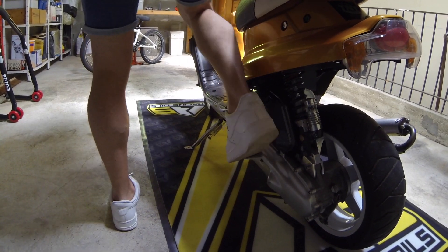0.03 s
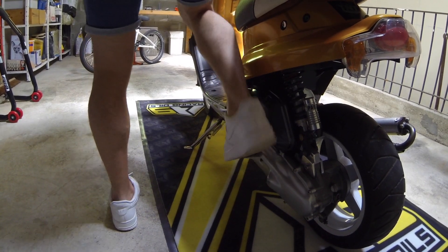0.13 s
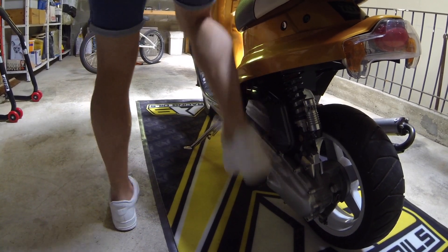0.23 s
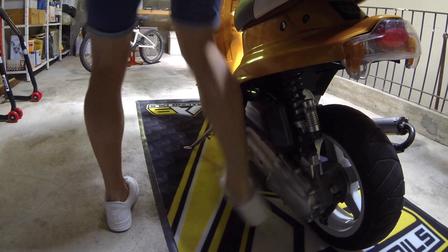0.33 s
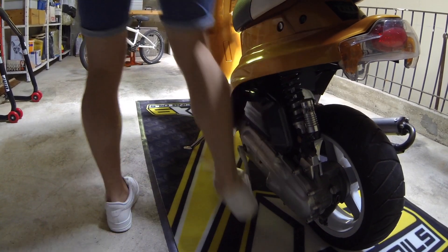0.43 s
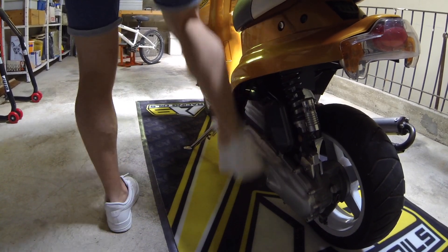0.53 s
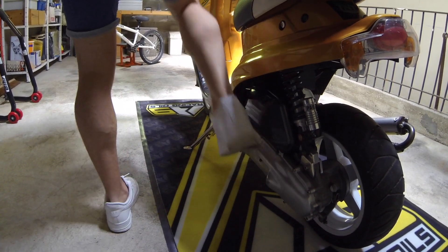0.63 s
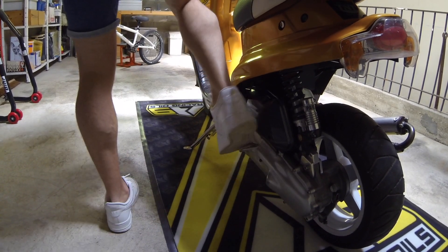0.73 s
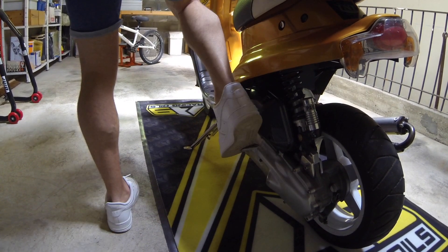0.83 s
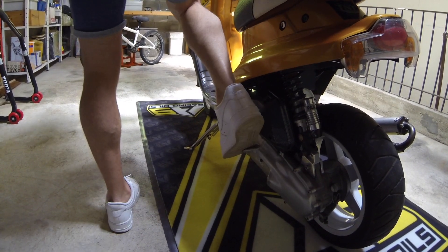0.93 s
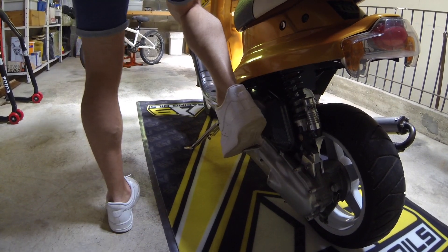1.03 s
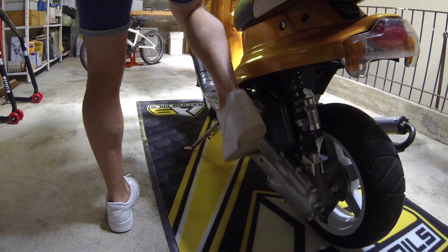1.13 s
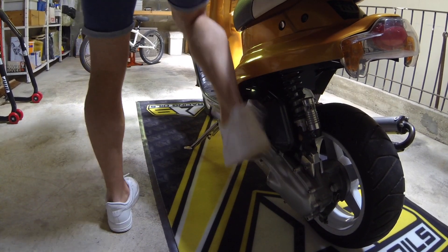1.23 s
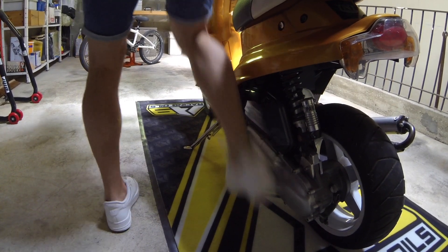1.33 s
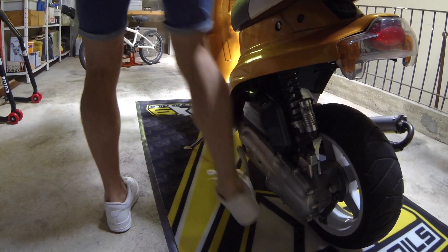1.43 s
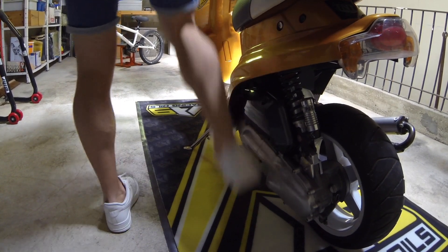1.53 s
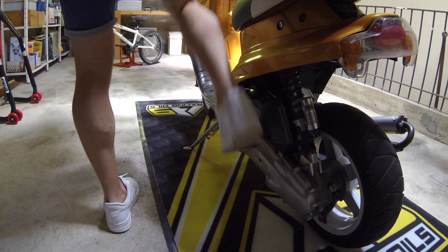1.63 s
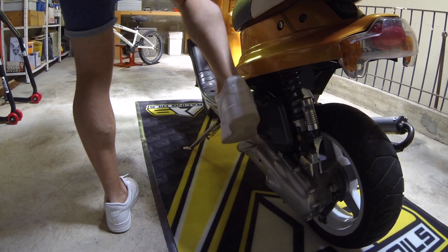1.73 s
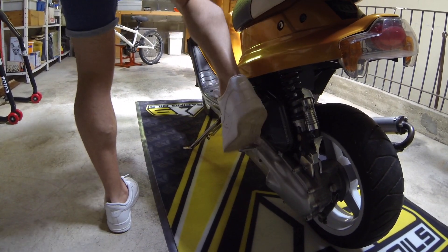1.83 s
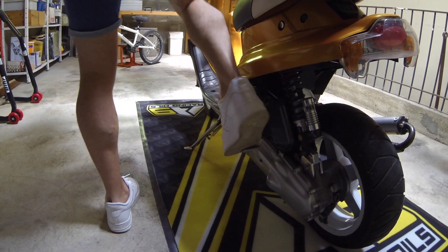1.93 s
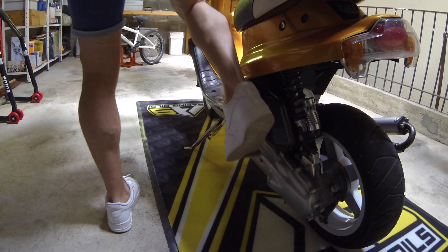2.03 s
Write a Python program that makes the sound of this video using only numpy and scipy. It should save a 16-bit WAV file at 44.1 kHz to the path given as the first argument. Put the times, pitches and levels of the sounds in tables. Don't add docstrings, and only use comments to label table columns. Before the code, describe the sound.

Two failed kick starts on a small scooter, heard close in an echoing concrete room: light lever clicks, grinding gear teeth, sharp clank at the stop, fading whirr and soft exhaust puffs, springy lever return.

```python
import sys
import numpy as np
from scipy import signal
from scipy.fft import rfft, irfft
from scipy.io import wavfile
from scipy.ndimage import uniform_filter1d

SR = 44100
rng = np.random.default_rng(int(sys.argv[2]) if len(sys.argv) > 2 else 0)


def field_ratio(decibels):
    return 10 ** (np.asarray(decibels, dtype=float) / 20)


def waveform_to_disk(signal):
    frames = np.transpose(np.atleast_2d(signal))
    scaled = np.clip(frames, -1, 1) * 32767
    samples = np.round(scaled).astype(np.int16)
    wavfile.write(sys.argv[1], SR, samples)


N = 92610

# frequency in Hz, density in dB per Hz.
AIR_SPECTRUM = [(12, -26.5), (20, 7), (60, -7), (150, -21.5), (193, -31.5), (270, -20.5), (5230, -46.5),
                (13500, -56.5), (16000, -71.5)]
# frequency in Hz, t60 in seconds.
GARAGE_DECAY = [(100, 0.98), (700, 0.45), (3000, 0.42), (12000, 0.29)]

# time in seconds, whirr level in dB.
COAST_LEVELS = [
    [(0.29, -26.5), (0.336, -41), (0.414, -44), (0.451, -40), (0.459, -32), (0.47, -53), (0.632, -85),
     (0.64, -54)],
    [(1.33, -26), (1.396, -44), (1.504, -41), (1.522, -50), (1.566, -48), (1.684, -65), (1.69, -52)],
]
# frequency in Hz, density in dB per Hz.
WHIRR_SPECTRUM = [(120, -54), (200, -4), (437, 2.5), (1110, -14), (1260, -13), (1430, -40.5), (1810, -1),
                  (11800, -41), (15500, -44)]
# start in seconds, length in seconds, level in dB.
EXHAUST_PUFFS = [(.21, 0.18, -33), (.285, 0.15, -28), (.41, 0.026, -43), (.53, 0.046, -35.5),
                 (.56, 0.042, -40.5), (1.085, 0.05, -45.5), (1.245, 0.2, -33), (1.32, 0.062, -28),
                 (1.41, 0.046, -33.5), (1.48, 0.077, -39.5), (1.585, 0.054, -37), (1.775, 0.037, -40),
                 (1.7, 0.07, -46.5), (2.03, 0.042, -51)]
# frequency in Hz, width in Hz, level in dB.
EXHAUST_MODES = [(38.3, 8.6, -6), (61.6, 14, 1.5), (121, 20.1, 4), (140.8, 20, 1.5), (256, 53.6, -3)]
# start in seconds, length in seconds, pitch in Hz, level in dB.
BEARING_SQUEAKS = [(0.417, 0.079, 1770, -42), (1.42, 0.13, 1850, -52), (1.451, 0.053, 1280, -38),
                   (1.534, 0.035, 1322, -38.5), (1.557, 0.043, 1255, -38), (0.456, 0.19, 1824, -51)]

# time in seconds, peak in dB.
SPRING_TICKS = [(0.192, -55), (.217, -53.5), (.24, -53.5), (.262, -50), (0.36, -37.5), (0.726, -46.5),
                (1.2386, -63), (1.274, -62), (1.4384, -46), (1.4599, -42), (1.497, -52.5), (1.561, -56),
                (1.709, -43.5), (1.785, -42.5)]
# time in seconds, level in dB.
COVER_KNOCKS = [(.059, -46.5), (.074, -42.5), (0.565, -34), (0.645, -33.5), (.6476, -31), (.6528, -29.5),
                (0.714, -37.5), (1.207, -39.5), (1.6925, -34), (1.6977, -28.5), (1.7028, -30),
                (1.7221, -31.5), (1.796, -48)]
# frequency in Hz, level in dB, t60 in seconds.
COVER_MODES = [(658, -15.5, 0.19), (695, -9, 0.08), (736, -10, 0.061), (776.7, 0, 0.13), (830, -14, 0.14),
               (541, -24, 0.15)]
# time in seconds, level in dB.
LEVER_RETURNS = [
    (0.6427, -42),
    (0.6461, -40.5),
    (1.6923, -45.5),
    (1.6956, -41.5),
]
# frequency in Hz, level in dB, t60 in seconds.
LEVER_MODES = [(1080, -10.5, 0.037), (1350, -8, .025), (1876, 4, 0.047), (2370, 0.5, 0.032),
               (2670, -1.5, 0.038), (3340, -16, .02), (3920, 3, .02), (4360, 2, 0.013), (4940, -2.5, 0.01),
               (5160, -3, .012), (5900, -14, .012)]

# time in seconds, level in dB.
GEAR_STROKES = [
    [(0.15, -57.5), (0.197, -36)],
    [(0.204, -33.5), (0.218, -25.5), (0.26, -28), (0.272, -22.5)],
    [(0.292, -26), (0.418, -39.5), (0.434, -32), (0.46, -37.5), (0.53, -64)],
    [(1.19, -48), (1.212, -47.5), (1.22, -56), (1.23, -36.5)],
    [(1.237, -33.5), (1.261, -24), (1.291, -32.5), (1.31, -23)],
    [(1.33, -34), (1.382, -32), (1.538, -42.5), (1.628, -45), (1.66, -45)],
]
# time in seconds, level in dB above the scrape.
LOADED_TEETH = [(0.205, 3.5), (0.2157, 3), (0.226, 5), (0.2351, 5.5), (.2445, 2.5), (.2525, 0),
                (0.2653, 4.5), (0.274, -1), (1.2366, 0), (1.25, 5.5), (1.2599, 0), (1.271, 8.5),
                (1.2847, 6.5), (1.297, 10), (1.311, 7.5)]
# frequency in Hz, width in Hz, level in dB.
GEAR_MODES = [(128, 37, -8), (253.5, 80, -8), (444.2, 41, 4), (641, 58, 3.5), (724, 110, 1),
              (853.5, 54, 2.5), (1135, 170, -10), (1850, 170, -16.5), (2400, 530, -26), (3800, 720, -28.5),
              (5240, 500, -35)]

# time in seconds, peak in dB, treble in dB, bass in dB, snap hardness in dB.
CONTACTS = [(0.0635, -39, -22.5, 4, -14), (0.0837, -37.5, -40.5, -2, 1), (0.161, -45.5, -33, -7.5, -11),
            (0.203, -40.5, -35, -2, -2), (0.2772, -5, -12.5, -3, 8), (0.4339, -26.5, -13, -1, 7),
            (0.438, -26.5, -9, -7, -2), (0.4537, -16.5, -10, -10, 1.5), (0.4575, -21.5, -15, -11, -3),
            (0.5662, -31.5, -39, -2, -10), (0.6433, -24.5, -22, -15, -6.5), (0.8324, -50.5, -40.5, 3.5, -8),
            (1.008, -49.5, -30, -5.5, -7), (1.0188, -23, -24.5, -12, 1.5), (1.0837, -24, -21.5, -3, 1.5),
            (1.208, -65, -33, -1.5, -1), (1.237, -36.5, -52, 6.5, -1), (1.3158, -6, -12.5, -2.5, 7.5),
            (1.5393, -39.5, -33, 1, 3), (1.5584, -30, -39, -1.5, -16), (1.6918, -21.5, -20, -15, -17),
            (1.9162, -23, -26, -11.5, 3.5), (1.9879, -34.5, -43, -4, 1)]
# frequency in Hz, density in dB per Hz.
CRACK_SPECTRUM = [(59, -42.5), (100, -13.5), (791, -3), (1090, -8), (2580, -10.5), (3120, -11),
                  (7560, -28.5), (9740, -27), (15500, -42.5)]
# frequency in Hz, level in dB, t60 in seconds.
CASE_MODES = [(190, -11.5, 0.022), (300, -8.5, 0.03), (434, -17, 0.024), (747, 0, 0.018), (828, -2, 0.028),
              (1301, -3.5, 0.021), (1530, -10.5, .025), (1870, -4.5, 0.019), (2050, -7.5, 0.03),
              (3116, -7, 0.012), (3188, -8, 0.023), (3538, -6, 0.023), (3840, -4.5, 0.017),
              (5316, -8.5, 0.02)]


def rms_one(x):
    return x / np.sqrt(np.mean(x ** 2) + 1e-20)


def at_hz(points, hz):
    table_hz, value = np.array(points).T
    return np.interp(np.log(hz + 1e-9), np.log(table_hz), value)


def coloured(x, spectrum):
    gain = field_ratio(at_hz(spectrum, np.fft.rfftfreq(N, 1 / SR)))
    return irfft(rfft(x) * rms_one(gain), N)


def cut(x, hz, kind):
    return signal.sosfilt(signal.butter(4, hz, kind, fs=SR, output="sos"), x)


def ring(x, hz, t60):
    r, w = field_ratio(-60 / (t60 * SR)), 2 * np.pi * hz / SR
    return signal.lfilter([0, np.sin(w)], [1, -2 * r * np.cos(w), r * r], x + 1e-18)


def resonate(x, table):
    out = 0
    for k, (hz, width, db) in enumerate(table):
        r, w = np.exp(-np.pi * width / SR), 2 * np.pi * hz / SR
        mode = signal.lfilter([1 - r * r, 0, r * r - 1], [1, -2 * r * np.cos(w), r * r], x)
        out = out + (-1) ** k * field_ratio(db) * mode
    return out


def grit(spread_db):
    grain_db = spread_db * np.minimum(rng.exponential(1, N), 4)
    return rms_one(rng.standard_normal(N) * field_ratio(grain_db))


def clicks(times, gains_db):
    out = np.zeros(N)
    index = (np.asarray(times) * SR).astype(int)
    np.add.at(out, np.clip(index, 0, N - 1), field_ratio(gains_db))
    return out


def bursts(times, gains_db, rise, decay):
    starts = clicks(np.asarray(times) - rise, gains_db)
    fall = signal.lfilter([1], [1, -np.exp(-1 / (decay * SR))], starts + 1e-18)
    steps = max(int(rise * SR), 1)
    return np.convolve(fall, np.ones(steps) / steps)[:N]


def swells(rows):
    t = np.arange(N) / SR
    out = 0
    for start, length, db in rows:
        phase = np.clip((t - start) / length, 0, 1)
        out = out + field_ratio(db) * np.sin(np.pi * phase ** 0.38)
    return out


def level(tables):
    t = np.arange(N) / SR
    out = 0
    for rows in tables:
        s, db = np.transpose(rows)
        out = out + field_ratio(np.interp(t, [s[0] - .008, *s, s[-1] + 0.12], [-100, *db, -100]))
    return out


def air():
    return field_ratio(-49.5) * rms_one(coloured(rng.standard_normal(N), AIR_SPECTRUM))


def garage(x):
    first_echo_s = 0.002
    t, tail = np.arange(SR) / SR, 0
    for hz in 60 * 2. ** np.arange(8):
        octave = signal.butter(2, [hz, 2 * hz], "band", fs=SR, output="sos")
        band = signal.sosfilt(octave, rng.standard_normal(SR))
        tail = tail + band * field_ratio(-60 * t / at_hz(GARAGE_DECAY, hz * 2.8))
    tail = tail * np.clip(t / first_echo_s, 0, 1) ** 2
    return signal.fftconvolve(x, tail / np.sqrt(np.sum(tail ** 2)))[:N]


def whirr():
    grains_per_s = 1200
    large = rng.random(N) < grains_per_s / SR
    grains = rng.standard_normal(N) * (0.45 + 1.5 * large)
    return field_ratio(2) * rms_one(coloured(grains, WHIRR_SPECTRUM)) * level(COAST_LEVELS)


def exhaust():
    breath = cut(resonate(rng.standard_normal(N), EXHAUST_MODES), 2300, "low")
    breath = breath / np.sqrt(uniform_filter1d(breath ** 2, size=1500))
    return breath * swells(EXHAUST_PUFFS)


def squeaks():
    noise, out = rng.standard_normal(N), 0
    for start, length, hz, db in BEARING_SQUEAKS:
        peak = [(hz, 160, 0)]
        tone = resonate(resonate(noise, peak), peak)
        tone = tone / np.sqrt(uniform_filter1d(tone ** 2, size=1200))
        out = out + tone * swells([(start, length, db)])
    return out


def ticks():
    s, db = np.transpose(SPRING_TICKS)
    peak = [(10320, 5300, 0)]
    bright = rms_one(resonate(resonate(grit(4.8), peak), peak))
    return bright * bursts(s, db - 11, rise=0.002, decay=0.0063)


def cover():
    s, db = np.transpose(COVER_KNOCKS)
    rattle = rng.standard_normal(N) * bursts(s, db - 35.5, rise=0.0047, decay=0.037)
    drive, out = clicks(s, db) + rattle, 0
    for hz, gain_db, t60 in COVER_MODES:
        out = out + field_ratio(gain_db) * ring(drive, hz, t60)
    return cut(out, [330, 1600], "band")


def lever():
    s, db = np.transpose(LEVER_RETURNS)
    draw = rng.standard_normal((len(s), len(LEVER_MODES)))
    out = 0
    for k, (hz, gain_db, t60) in enumerate(LEVER_MODES):
        out = out + ring(clicks(s, db + gain_db + 2.0 * draw[:, k]), hz, t60)
    return cut(out, 5300, "low")


def gear():
    teeth_per_s, jitter, spread_db, cut_hz = 95, 0.27, 0.5, 6300
    draw = rng.standard_normal((400, 2))
    s = np.cumsum(np.clip(1 + jitter * draw[:, 0], .3, 3) / teeth_per_s)
    loaded_s, loaded_db = np.transpose(LOADED_TEETH)
    gap = np.abs(s[:, None] - loaded_s).min(axis=1)
    free = (s < N / SR) & (gap > .012)
    tooth_s = np.r_[s[free], loaded_s]
    tooth_db = np.r_[spread_db * draw[free, 1], loaded_db]
    pulse = 0.81 + bursts(tooth_s, tooth_db, rise=0.0033, decay=0.003)
    pulse = uniform_filter1d(pulse, size=60)
    body = cut(cut(resonate(grit(0.61), GEAR_MODES), cut_hz, "low"), cut_hz, "low")
    even = np.sqrt(uniform_filter1d(body ** 2, size=400))
    return cut(field_ratio(-3.5) * body / even * pulse * level(GEAR_STROKES), cut_hz, "low")


def hits():
    bass_hz, treble_hz = 315, 4950
    s, db, treble_db, bass_db, hard_db = np.transpose(CONTACTS)
    treble_db = treble_db + 12.5
    noise, near, far = grit(2.5), 0, 0
    bands = [(bass_db, .001, bass_hz, "low"),
             (0, .002, [bass_hz, treble_hz], "band"),
             (treble_db, .004, [treble_hz, 15300], "band")]
    for extra_db, lag, edges, kind in bands:
        chatter = noise * bursts(s + lag, db + extra_db, rise=0.0034, decay=0.0026)
        near = near + cut(coloured(chatter, CRACK_SPECTRUM), edges, kind)
        far = far + cut(coloured(clicks(s + lag, db + extra_db), CRACK_SPECTRUM), edges, kind)

    snap_s, snap_db = s + 0.001221, db + hard_db
    floor_echo = clicks(snap_s + 0.002566, snap_db - 3.5)
    snap = clicks(snap_s, snap_db) + floor_echo
    thud = clicks(snap_s, snap_db + 2 * bass_db + 9.5)
    ping = clicks(snap_s, snap_db + treble_db)
    case = 0
    for hz, gain_db, t60 in CASE_MODES:
        blow = thud if hz < bass_hz else snap if hz < treble_hz else ping
        case = case + field_ratio(gain_db) * ring(-blow, hz, t60)
    return field_ratio(-2) * near + field_ratio(-12) * cut(case, 5900, "low"), field_ratio(16.5) * far


def scene():
    near, far = hits()
    spring, arm = ticks(), lever()
    inner = cover() + gear() + whirr() + exhaust() + squeaks()
    send = far + field_ratio(-5.5) * (inner + spring) + field_ratio(-1.5) * arm
    return (near + spring + inner + arm + field_ratio(-4) * garage(send) + air())[None]


def roll_off(x):
    return signal.sosfilt(signal.butter(12, 16430, fs=SR, output="sos"), x)


def record(dry):
    soft = 1.05 * np.tanh(dry / 1.05)
    mic = signal.sosfilt(signal.cheby2(10, 40, 16450, fs=SR, output="sos"), soft)
    return roll_off(mic)


dry = scene()
out = record(dry)
waveform_to_disk(out)
```